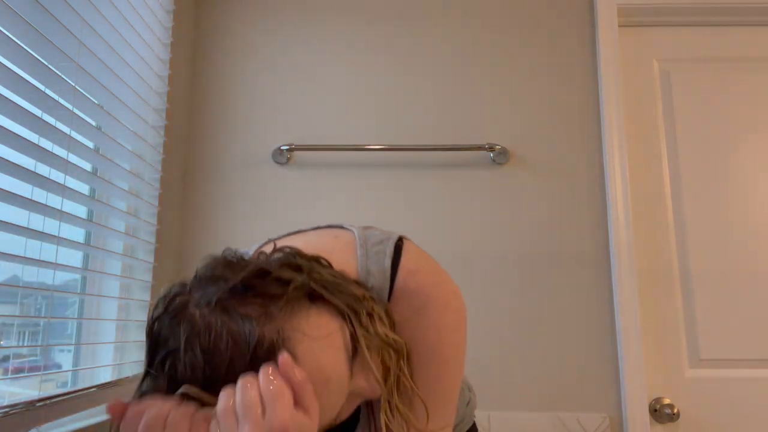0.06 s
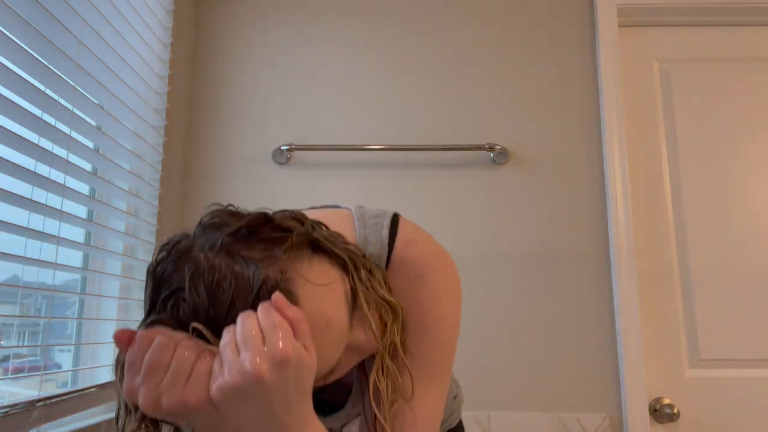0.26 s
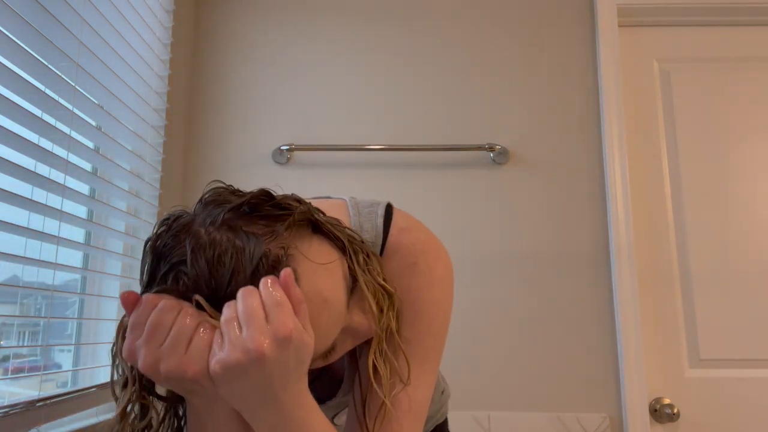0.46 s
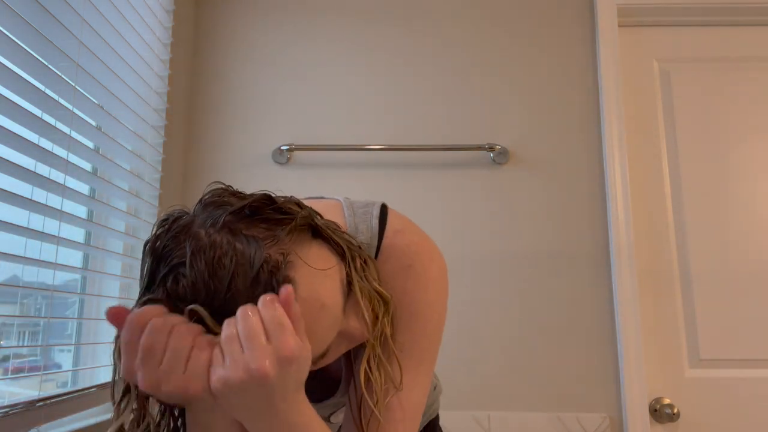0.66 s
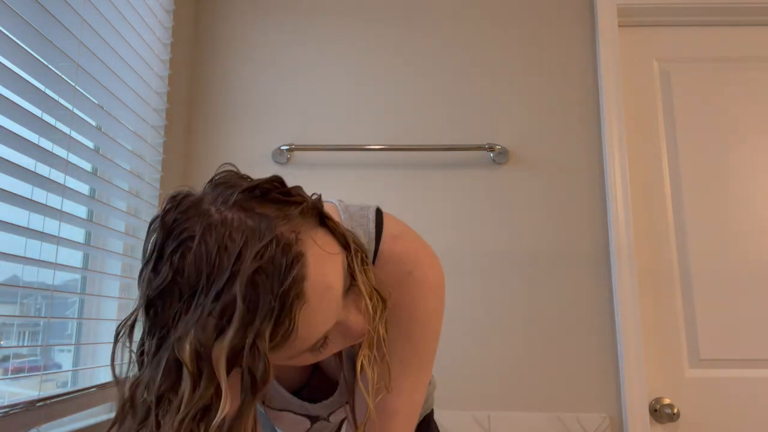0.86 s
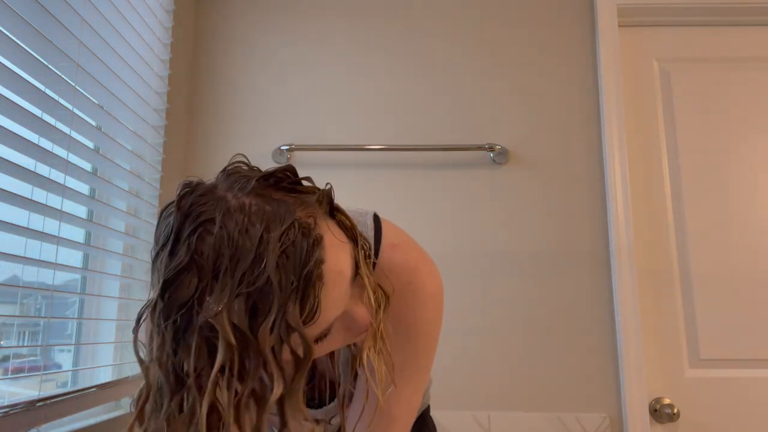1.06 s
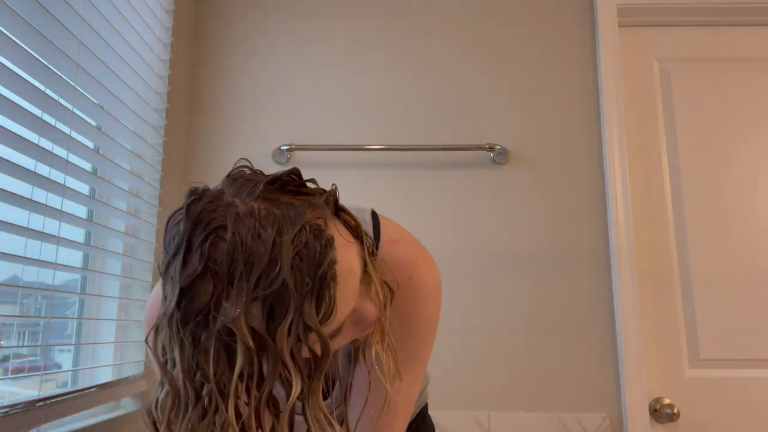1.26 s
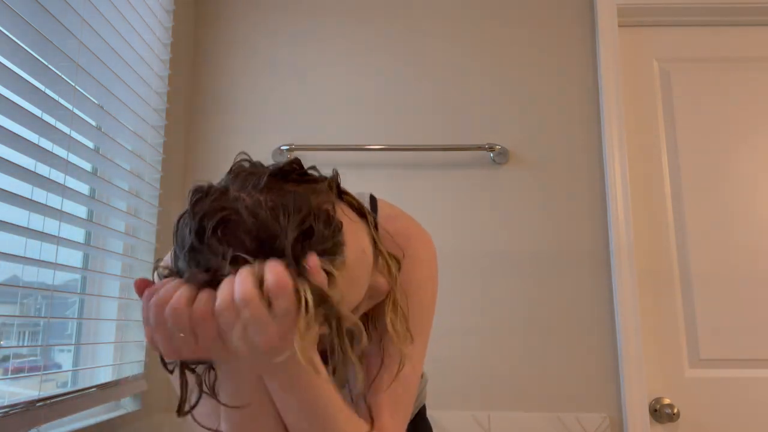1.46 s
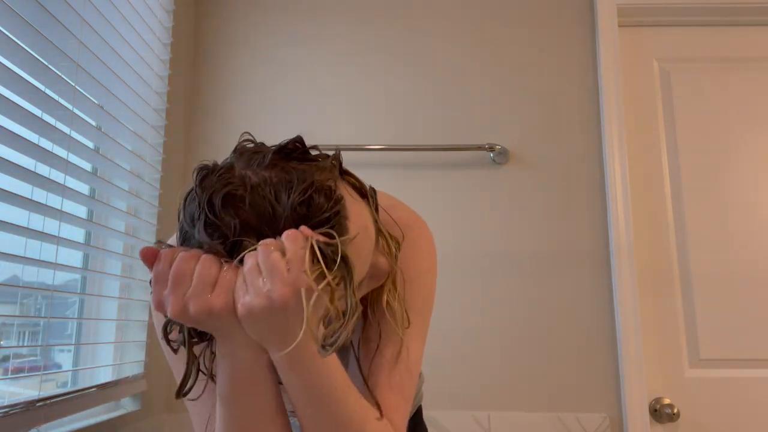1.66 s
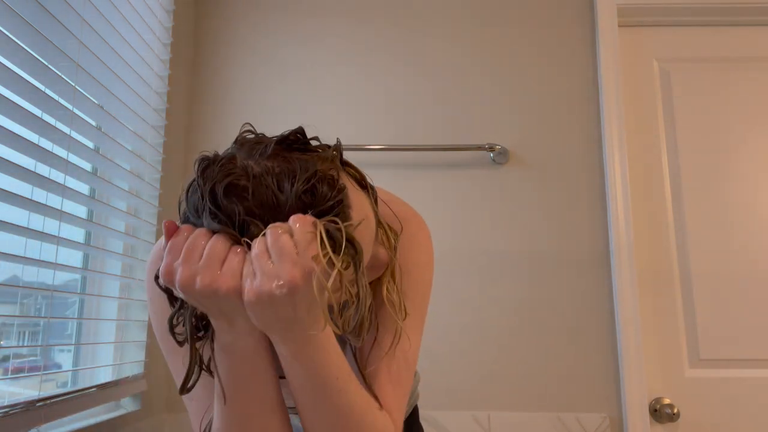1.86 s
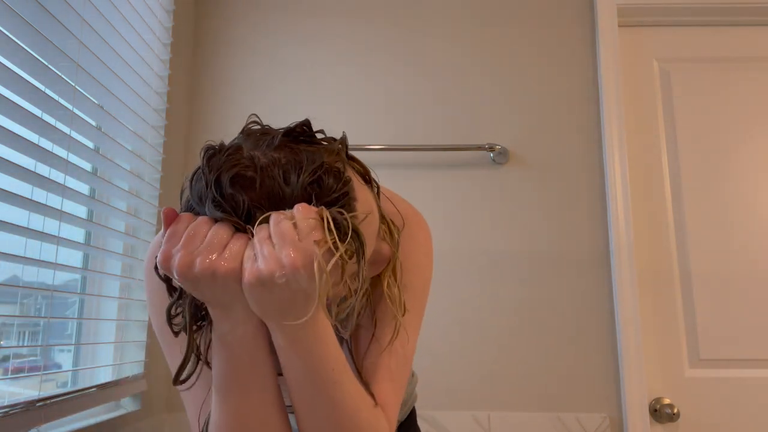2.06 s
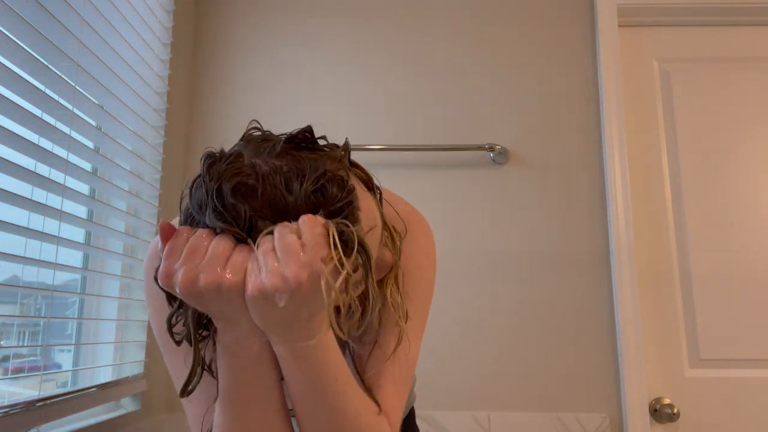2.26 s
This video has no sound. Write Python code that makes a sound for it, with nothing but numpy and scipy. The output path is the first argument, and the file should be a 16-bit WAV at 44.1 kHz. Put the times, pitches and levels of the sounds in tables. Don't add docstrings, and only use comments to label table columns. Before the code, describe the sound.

Wet hair is scrunched by hand, close, in a small tiled bathroom. Fizzy squishing starts at about 0.05 s, with bubbly plops from 0.2 s and the loudest squelch near 0.45 s as water drums hollowly into the tub until 0.65 s. Small drips fall around 0.85 s, then near quiet with faint ticks. A softer, duller squeeze runs 1.5-2.1 s, then faint fan tone.

```python
import sys
import numpy as np
from scipy import signal
from scipy.fft import rfft, irfft, next_fast_len
from scipy.io import wavfile
from scipy.ndimage import uniform_filter1d, map_coordinates

SR = 44100
rng = np.random.default_rng(int(sys.argv[2]) if len(sys.argv) > 2 else 0)


def to_wav(s):
    ch = np.atleast_2d(s).T
    pcm = np.round(np.clip(ch, -1, 1) * 32767)
    wavfile.write(sys.argv[1], SR, pcm.astype(np.int16))


def gain_from_db(level_db):
    decades = np.asarray(level_db, float) / 20
    return 10 ** decades


N = 101429


def unit(x):
    return x / np.sqrt(np.mean(x ** 2) + 1e-20)


def along(points, hz):
    point_hz, value = np.transpose(points)
    return np.interp(np.log(hz + 1), np.log(point_hz + 1), value)


def curves(rows):
    time_s, *columns = np.transpose(rows)
    return [np.interp(np.arange(N) / SR, time_s, column) for column in columns]


def filtered(x, response):
    size = next_fast_len(N + SR // 2)
    spectrum = rfft(x, size) * response(np.fft.rfftfreq(size, 1 / SR))
    return irfft(spectrum, size)[..., :N]


def spray(per_s, spread_db, share):
    chance, size = rng.random(N), rng.exponential(1, N)
    sign_noise, hiss = rng.standard_normal((2, N))
    clicks = (chance < per_s / SR) * gain_from_db(spread_db * np.minimum(size, 4)) * np.sign(sign_noise)
    share = np.clip(share, 0, 1)
    return np.sqrt(share) * unit(clicks) + np.sqrt(1 - share) * hiss


def patchy(x, patchy_db):
    z = signal.stft(x, nperseg=256)[2]
    field = uniform_filter1d(rng.standard_normal(z.shape), 4, 0)
    field = uniform_filter1d(field, 6, 1)
    gain = gain_from_db(patchy_db * unit(field))
    return unit(signal.istft(z * gain, nperseg=256)[1][:N])


def body(peaks):
    def response(f):
        return sum((-1) ** k * gain_from_db(db) * 1j * f * width / (hz * hz - f * f + 1j * f * width)
                   for k, (hz, width, db) in enumerate(peaks))
    return response


def fizz(colour):
    grains = spray(per_s=2800, spread_db=6.5, share=0.34)
    return patchy(filtered(grains, lambda hz: gain_from_db(along(colour, hz))), patchy_db=2.8)


def hair():
    # time [s], fizz level [dB], dullness [0-1].
    grip_rows = [(.04, -58.5, 0.03), (.08, -42, 0.02), (.19, -39, 0.07), (.24, -35.5, 0.32),
                 (.42, -33.5, 0.61), (.46, -30.5, 0.38), (.58, -39.5, 1), (.66, -48.5, 0.54),
                 (.74, -63, 0.6), (.8, -106, 0.47), (1.22, -92, 0), (1.3, -75, 0.02), (1.4, -90.5, 0.1),
                 (1.51, -72.5, 0), (1.56, -34.5, 0.93), (1.68, -47, 0.75), (1.88, -52, 1), (1.94, -60, 1),
                 (2.02, -38.5, 0.64), (2.1, -51, 0.23), (2.2, -88, 0.1)]
    # start [s], level [dB], rise [s], t60 [s], dullness [0-1].
    squelch_rows = [(0.086, -27.5, 0.0013, .06, 0.2), (0.213, -27.5, 0.0028, 0.16, 0.6),
                    (0.249, -23.5, 0.00084, 0.02, 0.2), (.054, -38.5, 0.0017, .08, 0.01),
                    (.017, -43.5, 0.0013, .05, 0), (0.882, -75, 0.0021, .06, 0),
                    (0.276, -26.5, 0.0017, 0.098, 1), (0.306, -24.5, 0.0053, 0.21, 0.5),
                    (0.435, -18, 0.00066, 0.067, 0.6), (0.445, -24.5, .001, 0.024, 0.1),
                    (0.457, -27, 0.00082, 0.23, 0.8), (0.551, -31.5, 0.0039, .15, 0.92),
                    (0.608, -35.5, 0.0013, 0.096, 0.34), (0.667, -35.5, 0.0075, 0.102, 0.93),
                    (1.146, -56.5, 0.01, 0.24, 0.12), (1.316, -54, 0.00085, 0.12, 0),
                    (1.413, -71.5, 0.0028, 0.21, 0), (1.465, -69.5, 0.0073, 0.18, 0.3),
                    (1.526, -29.5, 0.0038, .05, 0.74), (1.545, -25.5, 0.0021, .2, 0.66),
                    (1.691, -25, 0.021, 0.13, 0.76), (1.796, -31.5, 0.003, 0.05, 0.92),
                    (1.831, -33.5, 0.0052, 0.2, 0.84), (1.975, -28.5, 0.0064, 0.09, 0.99),
                    (1.999, -33, 0.0032, 0.2, 0.08), (2.287, -59.5, 0.011, 0.31, 0)]
    # frequency [Hz], density [dB per Hz].
    thin_colour = [(500, -36.5), (1000, -22), (3000, -5.5), (7300, 0.5), (9000, 1), (11000, -2.5),
                   (13500, -7), (15800, -12)]
    # frequency [Hz], density [dB per Hz].
    fat_colour = [(350, -44), (700, -24), (1100, -5.5), (1800, 1), (3000, -0.5), (5000, -13), (8200, -2.5),
                  (9500, -49.5)]
    thin, fat = fizz(thin_colour), fizz(fat_colour)
    grip_db, dull = curves(grip_rows)
    dull = np.clip(dull, 0, 1)
    power = gain_from_db(2 * grip_db) * np.array([1 - dull, dull])
    for start_s, db, rise_s, t60_s, dullness in squelch_rows:
        t = np.maximum(np.arange(N) / SR - start_s, 0)
        envelope = gain_from_db(db - 60 * t / t60_s) * (1 - np.exp(-t / rise_s))
        power += envelope ** 2 * np.clip([[1 - dullness], [dullness]], 0, 1)
    return np.sqrt(power[0]) * thin + np.sqrt(power[1]) * fat


def drops():
    # start [s], level [dB], pitch [Hz], t60 [s], width [Hz].
    drop_rows = [(.016, -35, 2586, 0.047, 304), (.053, -35.5, 2062, 0.16, 450.8),
                 (1.15, -66, 5010, 0.18, 1480), (.213, -26.5, 2240, 0.024, 600),
                 (.253, -16, 1060, 0.031, 180), (.274, -25.5, 1750, 0.047, 700),
                 (.289, -14.5, 1033, 0.044, 200.4), (.305, -24, 1750, 0.065, 700),
                 (.353, -23, 975, 0.055, 150), (.370, -12.5, 1150, 0.028, 250),
                 (.372, -23, 620, 0.026, 120), (.379, -18.5, 992, .05, 150),
                 (0.433, -16.5, 6900, 0.085, 1802), (.412, -21, 1100, 0.069, 250),
                 (.436, -13.5, 612, .07, 70.1), (.452, -9.5, 2497, 0.015, 700),
                 (.544, -26.5, 1120, 0.048, 300), (.668, -32.5, 1963, 0.077, 400),
                 (.834, -45.5, 1250, 0.082, 500), (.846, -46, 703, .2, 318), (.848, -48.5, 1150, 0.11, 500),
                 (.868, -48, 1050, 0.081, 500), (.883, -47.5, 3080, 0.048, 600),
                 (.929, -66.5, 3690, 0.079, 200), (1.16, -52, 3250, 0.058, 450),
                 (1.314, -54.5, 3980, 0.16, 400), (1.465, -58, 5030, 0.049, 400),
                 (1.529, -27.5, 1700, 0.043, 1200), (1.548, -24.5, 1300, 0.087, 1300),
                 (1.552, -27.5, 4800, 0.16, 1200), (1.59, -35, 1700, 0.28, 700),
                 (1.698, -31.5, 5490, 0.14, 2225), (1.701, -32, 1130, 0.056, 250),
                 (1.768, -38.5, 1900, 0.068, 500), (1.8, -24, 2615, 0.029, 1504),
                 (1.805, -42.5, 1161, 0.049, 120), (1.833, -41.5, 1900, 0.16, 1000),
                 (1.94, -47.5, 1200, 0.098, 500), (1.978, -38, 1055, 0.062, 300),
                 (2.008, -36, 1864, 0.15, 900)]
    pitch_rise, attack_s = 0.039, 0.0025
    clear_hz, roughest = 300, 1.5
    out = np.zeros(N + SR)
    t = np.arange(SR // 4) / SR
    for start_s, db, hz, t60_s, width_hz in drop_rows:
        in_phase, quadrature = map_coordinates(
            rng.standard_normal(4000), [np.array([t, t + 1]) * width_hz], order=1)
        phase = 2 * np.pi * hz * t * (1 + pitch_rise * t / t60_s)
        rough = min(width_hz / clear_hz, roughest)
        ring = (1 + rough * in_phase) * np.sin(phase) + rough * quadrature * np.cos(phase)
        ring /= np.hypot(1, rough)
        envelope = gain_from_db(db - 60 * t / t60_s) * (1 - np.exp(-t / attack_s))
        out[round(start_s * SR):][:len(t)] += envelope * ring
    return out[:N]


def tub():
    # time [s], level [dB], depth of the low drum [dB].
    pour_rows = [
        (0.05, -76.5, 9.5),
        (0.09, -53.5, -5.5),
        (0.13, -53, 2),
        (0.286, -43.5, -9),
        (0.292, -46, -28),
        (0.326, -37.5, -20),
        (0.386, -21, -14),
        (0.55, -31, -14),
        (0.66, -82.5, -41),
    ]
    # centre [Hz], width [Hz], level [dB].
    hollow_peaks = [(588, 76, 3.5), (1057, 110, 3)]
    # centre [Hz], width [Hz], level [dB].
    drum_peaks = [(107, 23, 4), (152.7, 97, -5), (210.2, 13, 6.5), (381.2, 98, -8.5)]
    level_db, drum_db = curves(pour_rows)
    t = np.arange(N) / SR
    on = (t > pour_rows[0][0]) * gain_from_db(-250 * np.maximum(t - pour_rows[-1][0], 0))
    hollow, drum = [unit(filtered(spray(per_s=350, spread_db=3, share=0.65), body(peaks)))
                    for peaks in (hollow_peaks, drum_peaks)]
    return on * gain_from_db(level_db - 4.5) * (hollow + gain_from_db(drum_db + 8.5) * drum)


def room(x):
    # frequency [Hz], t60 [s].
    tile_decay = [(150, 0.32), (2000, 0.15), (10000, 0.19)]
    hz, t, z = signal.stft(rng.standard_normal((2, SR // 2)), SR, nperseg=256)
    decay = gain_from_db(-60 * t / along(tile_decay, hz)[:, None])
    tail = signal.istft(z * decay, SR, nperseg=256)[1]
    delayed = np.pad(x, (90, 0))[None]
    return signal.fftconvolve(delayed, tail / np.linalg.norm(tail[0]), axes=1)[:, :N]


def air():
    # time [s], level [dB].
    air_rows = [(0, -62), (.3, -58), (.8, -62), (1.05, -70), (1.15, -68), (1.3, -62.5), (1.48, -64.5),
                (1.6, -59.5), (1.9, -61), (2.0, -64), (2.3, -63.5)]
    # frequency [Hz], density [dB per Hz].
    tone_colour = [(18, -66), (30, -23.5), (143, -5.5), (511, -6.5), (1140, -17), (1560, -32.5),
                   (2250, -25), (3150, -31.5), (15000, -64.5)]
    # centre [Hz], width [Hz], level [dB].
    fan_peaks = [(153, 12, 6), (302, 16, 7), (1600, 67, 18.5)]
    level_db, = curves(air_rows)
    noise = rng.standard_normal((2, N))
    pair = filtered(noise, lambda hz: gain_from_db(along(tone_colour, hz)) * (1 + np.abs(body(fan_peaks)(hz))))
    common, opposed = [patchy(p, patchy_db=2) for p in pair]
    return gain_from_db(level_db) * np.array([common + 0.6 * opposed, common - 0.94 * opposed])


def scene():
    # frequency [Hz], left lead [half-turns].
    twist = [(100, 0), (2000, .3), (5000, .45), (7800, .55), (8600, 1), (9350, 1), (10900, 2), (12600, 2),
             (13600, 3), (15100, 3), (15350, 4), (16000, 4)]
    # start [s], length [s].
    snap_rows = [(.055, .012), (.225, .03), (.432, .014), (.605, .018), (1.15, .035), (1.31, .02),
                 (1.41, .05), (1.525, .05), (1.685, .055), (1.82, .03), (1.95, .07), (2.09, .05), (0, .04)]
    # frequency [Hz], level [dB].
    diffuse = [(60, -14), (200, -6), (1000, 0), (5000, 1), (7500, -4), (8400, -45)]
    lean_db, lean_ends_hz, snap_shift_half_turns = 2, (7000, 8500), 0.3
    water = hair() + drops() + tub()
    side = np.array([[0.5], [-0.5]])
    t = np.arange(N) / SR
    snap = sum(1.0 * (t > start_s) * (t < start_s + length_s) for start_s, length_s in snap_rows)
    snap = uniform_filter1d(snap, size=200)

    def lean(hz):
        return gain_from_db(side * np.interp(hz, lean_ends_hz, [lean_db, 0]))

    def ports(shift):
        def response(hz):
            half_turns = along(twist, hz) - np.interp(hz, lean_ends_hz, [0, shift])
            return lean(hz) * np.exp(1j * np.pi * side * half_turns)
        return response

    near = filtered(water * (1 - snap), ports(0))
    near += filtered(water * snap, ports(snap_shift_half_turns))
    far = filtered(room(water), lambda hz: lean(hz) * gain_from_db(along(diffuse, hz)))
    return near + far + air()


def masked(x):
    # frequency [Hz], level [dB].
    mask_bar = [(8700, -24.5), (10000, -20.5), (13000, -15), (14500, -15.5), (15600, -8)]
    mask_from_hz, top_hz, heard_db = 8700, 15900, -114
    sum_diff = np.array([x[0] + x[1], x[0] - x[1]]) / 2
    hz, _, z = signal.stft(sum_diff, SR, nperseg=2048)
    band = np.sqrt(np.abs(uniform_filter1d(np.abs(z) ** 2, size=9, axis=1)))
    mid_range = (hz > 1500) & (hz < 6000)
    masker = np.sqrt(np.mean(band[:, mid_range] ** 2, axis=(0, 1)))
    bar = gain_from_db(along(mask_bar, hz))[:, None] * masker + gain_from_db(heard_db)
    keep = (band > bar) | (hz < mask_from_hz)[:, None]
    z = z * keep * (hz < top_hz)[:, None]
    mid, side = signal.istft(z, SR, nperseg=2048)[1][:, :N]
    return np.array([mid + side, mid - side])


def roll_off(x):
    return signal.sosfilt(signal.butter(12, 15960, fs=SR, output="sos"), x)


def record(dry):
    low_cut_hz = 45
    mix = filtered(masked(dry), lambda hz: (1j * hz / (low_cut_hz + 1j * hz)) ** 2)
    return roll_off(mix)


dry = scene()
out = record(dry)
to_wav(out)
```